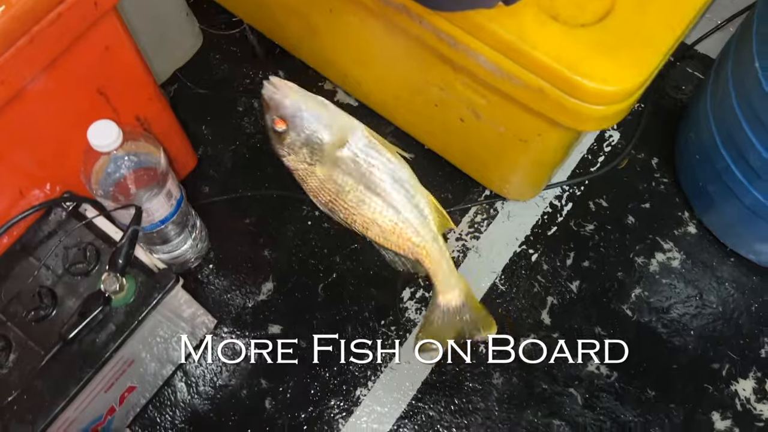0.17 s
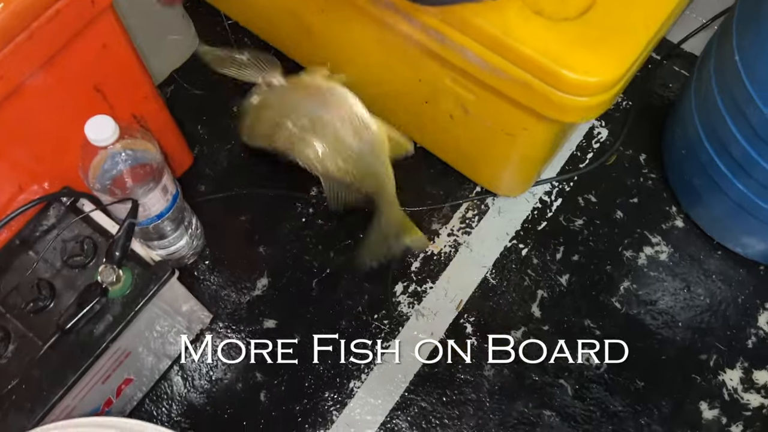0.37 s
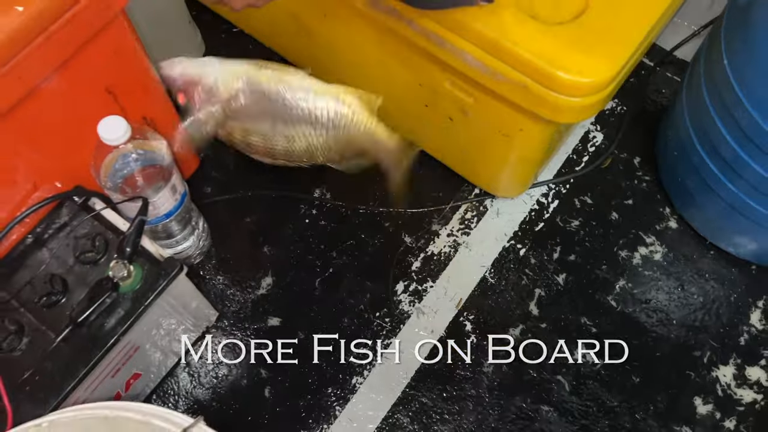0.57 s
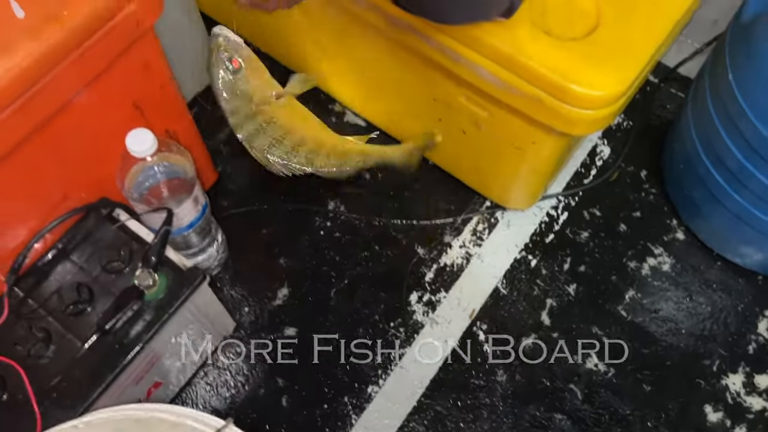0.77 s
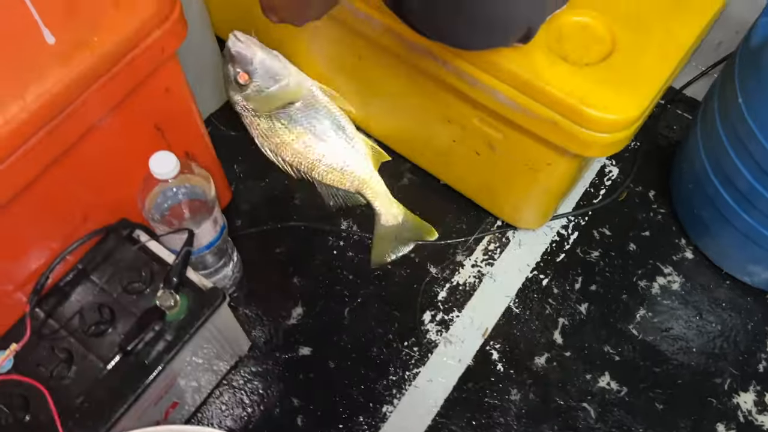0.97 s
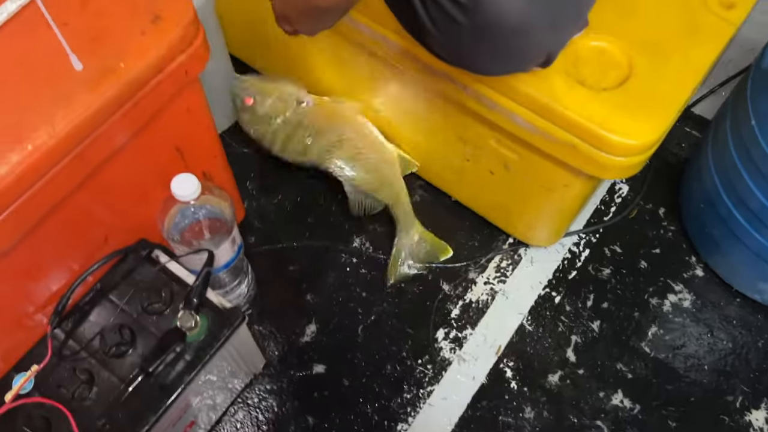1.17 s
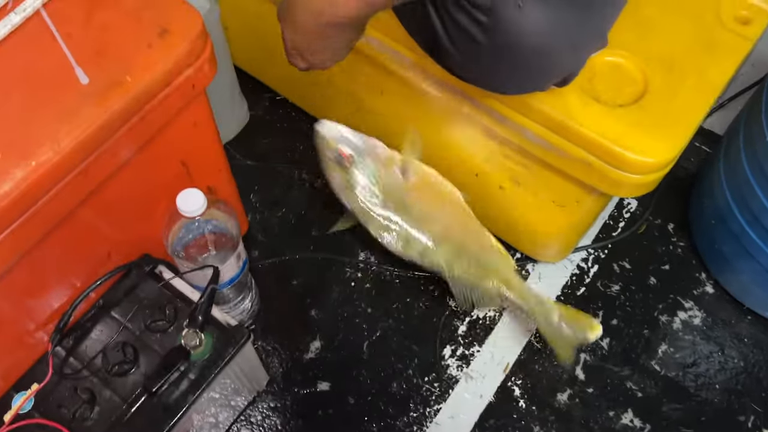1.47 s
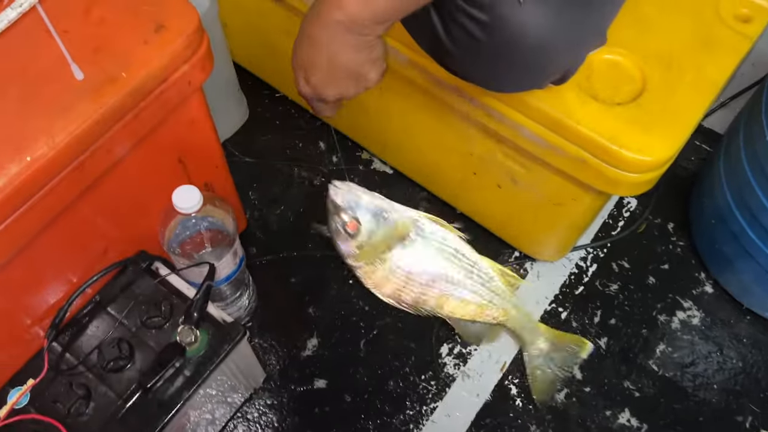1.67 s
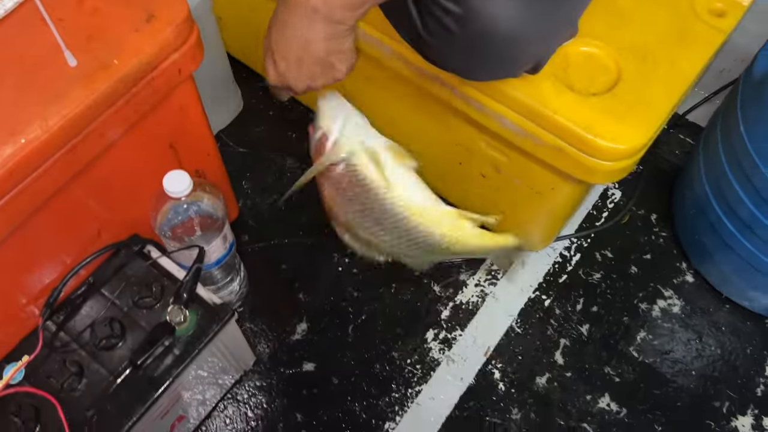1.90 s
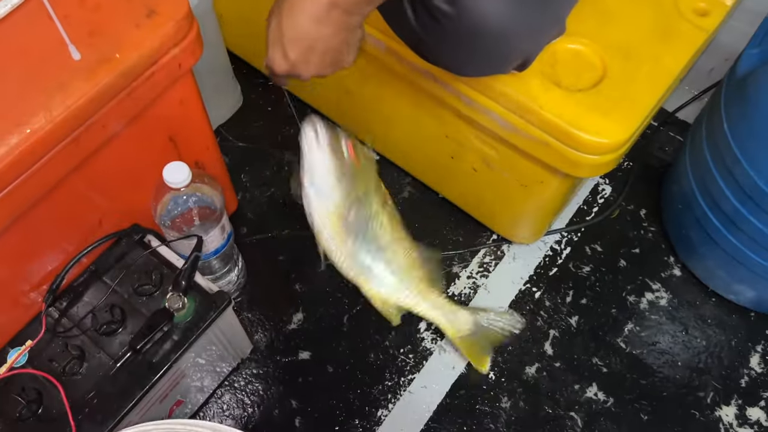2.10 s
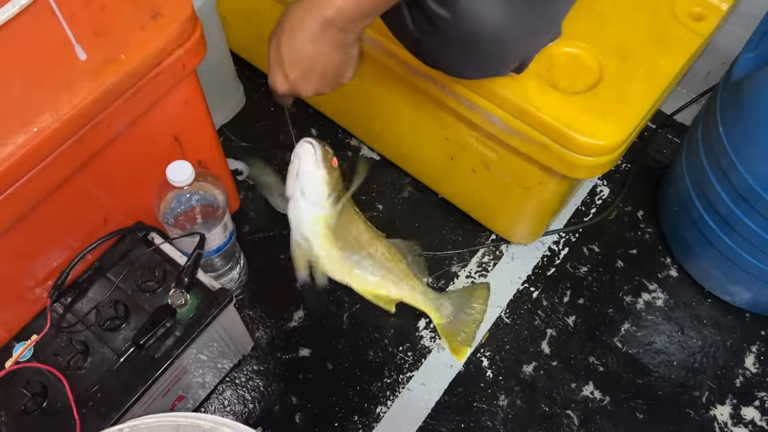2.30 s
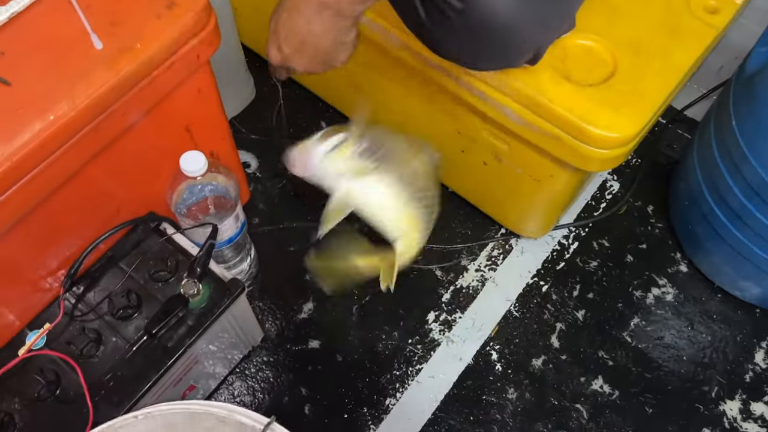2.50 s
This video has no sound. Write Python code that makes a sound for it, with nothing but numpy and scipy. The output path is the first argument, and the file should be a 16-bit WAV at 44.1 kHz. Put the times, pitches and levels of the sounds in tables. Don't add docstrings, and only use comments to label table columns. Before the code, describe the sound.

Fish flopping on deck: irregular hollow thumps, wet smacks, slippery slides and small ticks, close up

```python
import sys
import numpy as np
from scipy import signal
from scipy.fft import rfft, irfft, next_fast_len
from scipy.io import wavfile
from scipy.ndimage import uniform_filter1d

SR = 44100
rng = np.random.default_rng(int(sys.argv[2]) if len(sys.argv) > 2 else 0)


def invert_db(level):
    return 10 ** (np.asarray(level, dtype=float) / 20)


def unload_audio(sound):
    columns = np.transpose(np.atleast_2d(sound))
    steps = np.round(np.clip(columns, -1, 1) * 32767)
    wavfile.write(sys.argv[1], SR, steps.astype(np.int16))


N = 116865


def rms_one(x):
    return x / np.sqrt(np.mean(x ** 2) + 1e-20)


def at_hz(points, hz):
    table_hz, table_db = np.transpose(points)
    return np.interp(np.log(hz + 1), np.log(table_hz), table_db)


def drift(rate_hz):
    r = np.exp(-2 * np.pi * rate_hz / SR)
    white = rng.standard_normal(N + SR)
    return rms_one(signal.lfilter([1], [1, -2 * r, r * r], white)[SR:])


def add(out, start_s, x):
    i = max(int(start_s * SR), 0)
    out[..., i:i + x.shape[-1]] += x[..., :N - i]


def ring(x, hz, t60):
    r = invert_db(-60 / (t60 * SR))
    w = 2 * np.pi * hz / SR
    return signal.lfilter([0, np.sin(w)], [1, -2 * r * np.cos(w), r * r], x + 1e-18)


def highpass(order, hz, x):
    return signal.sosfilt(signal.butter(order, hz, "high", fs=SR, output="sos"), x)


def wet_noise(size, dull_hz, floor_db=0):
    white = rng.standard_normal((2, size))
    lowpass = signal.butter(2, min(dull_hz, .4 * SR), fs=SR, output="sos")
    dull = signal.sosfilt(lowpass, white) * np.sqrt(SR / 2 / dull_hz)
    return highpass(1, dull_hz / 20, dull + invert_db(floor_db - 9.5) * white)


# time in seconds, hull level in dB, hiss level in dB.
ROCKING_CURVE = [(0, 17, 8.5), (.15, 6, 0.5), (.3, 7.5, 11), (.43, 2, -2.5), (.56, -15, -1.5),
                 (.82, 3.5, -0.5), (.95, -1.5, -2.5), (1.2, -4.5, 8), (1.37, 0, -3), (1.47, 4, 5),
                 (1.67, 7.5, -0.5), (1.85, 2, 8.5), (2.0, -3, -2.5), (2.25, 6.5, 0), (2.4, 1, 2.5),
                 (2.58, -6, -0.5), (2.65, -11, -3.5)]


def rocking(column):
    rows = np.array(ROCKING_CURVE)
    return invert_db(np.interp(np.arange(N) / SR, rows[:, 0], rows[:, column]))


# frequency in Hz, level in dB per Hz.
WATER_SPECTRUM = [(150, 2.5), (400, -9), (1000, -13), (3000, -12), (8000, -19.5), (15000, -31)]


def water():
    hz = np.arange(N // 2 + 1) * SR / N
    white = rfft(rng.standard_normal((2, N)))
    hiss = irfft(white * invert_db(at_hz(WATER_SPECTRUM, hz)) * (hz > 40), N)
    return invert_db(-52.5 + 1.2 * drift(19)) * rocking(column=2) * rms_one(hiss)


def hull():
    mode_hz, width_hz = 68, 18
    white = rng.standard_normal((2, N + SR))
    once = ring(white, mode_hz, 1.1 / width_hz)
    hum = ring(once, mode_hz, 1.1 / width_hz)[:, SR:]
    return invert_db(-49.5 + .8 * drift(6)) * rocking(column=1) * rms_one(hum)


# start in seconds, level in dB, pitch in Hz, t60 in seconds.
BOARD_SWAYS = [(0.121, -51.5, 335, 0.25), (.22, -40, 44.3, 0.16), (0.421, -43, 71.4, 0.7),
               (0.881, -36.5, 102.7, 0.36), (1.239, -48, 200, 0.28), (1.279, -51, 289, 0.33),
               (1.409, -46, 120, 0.43), (1.459, -40, 98, 0.34), (1.547, -26.5, 441, 0.12),
               (1.601, -28, 45, .2), (1.59, -46.5, 531, 0.14), (1.662, -38, 140, 0.13),
               (1.81, -30, 42.2, 0.23), (2.189, -30, 322, 0.14), (2.222, -25, 117.6, 0.36),
               (2.238, -38, 189, 0.26), (2.3, -52.5, 624, 0.15), (2.354, -36.5, 96.8, 0.41)]


def sways():
    rise_cycles, pair_ratio = 1.8, 1.09
    out, t = np.zeros(N), np.arange(SR // 2) / SR
    for s, db, hz, t60 in BOARD_SWAYS:
        phase = rng.uniform(0, 2 * np.pi, 2)
        lower = np.sin(2 * np.pi * hz * t + phase[0])
        upper = 0.68 * np.sin(2 * np.pi * pair_ratio * hz * t + phase[1])
        swell = np.minimum(t * hz / rise_cycles, 1) ** 2
        add(out, s, invert_db(db - 60 * t / t60) * (lower + upper) * swell)
    return out


# start in seconds, length in seconds, level in dB, frequency in Hz above which it is dulled.
SKIN_SLIDES = [(.01, 0.091, -42, 5560), (0.19, 0.034, -49, 4520), (0.258, 0.11, -46, 8000),
               (0.336, 0.054, -50.5, 3000), (0.457, 0.12, -49.5, 7000), (0.574, 0.065, -43.5, 7460),
               (0.699, 0.066, -41, 2540), (0.922, 0.086, -58, 5960), (1.03, 0.056, -56, 2470),
               (1.142, 0.059, -45.5, 7560), (1.223, 0.11, -49.5, 2900), (1.29, 0.053, -47.5, 8200),
               (1.425, 0.06, -36, 6000), (1.708, 0.075, -48, 8650), (1.766, 0.08, -38.5, 8600),
               (1.83, 0.1, -59.5, 5000), (1.92, 0.3, -55.5, 4260), (2.255, 0.041, -52, 5960),
               (2.33, 0.049, -45, 8450), (2.424, 0.09, -46, 8250), (2.459, 0.053, -39, 12400),
               (2.507, 0.047, -47, 5540), (0.838, 0.024, -48.5, 8000), (0.082, 0.018, -46, 3020)]


def slides():
    pops_per_s, pop_db, rise_share = 250, -2.5, 0.39
    out, stroking = np.zeros((2, N)), np.zeros(N)
    rough = invert_db(3 * drift(72))
    for s, length, db, dull_hz in SKIN_SLIDES:
        noise = wet_noise(SR // 4, dull_hz)
        progress = np.arange(SR // 4) / SR / length
        swell = np.interp(progress, [0, rise_share, 1.3], [0, 1, 0])
        stroke = invert_db(db) * np.sin(np.pi / 2 * swell)
        add(out, s, noise * stroke)
        add(stroking, s, stroke)
    size_db = np.minimum(rng.exponential(1, N), 3)
    born = (rng.random(N) < pops_per_s / SR) * invert_db(size_db) * rng.choice([-1, 1], N)
    dealt = rng.integers(0, 12, N)
    pops = np.zeros(N)
    for k, hz in enumerate(np.geomspace(500, 3000, num=12)):
        pops += ring(born * stroking * (dealt == k), hz, 3.8 / hz)
    return out * rough + invert_db(pop_db) * pops


# start in seconds, length in seconds, level in dB, pitch in Hz, bandwidth in Hz.
RUBBING_SQUEAKS = [(.176, .025, -41, 3500, 500), (.352, .035, -45, 1600, 500), (.995, .03, -44, 2200, 700),
                   (1.122, .08, -44, 1900, 900), (1.155, .03, -50, 7300, 500),
                   (1.222, .035, -53, 4400, 1000), (2.26, .04, -57, 5100, 900), (2.32, .06, -58, 8630, 200),
                   (2.336, .085, -46, 3065, 20), (2.568, .06, -56, 1410, 70), (2.6, .06, -57, 1470, 70),
                   (2.595, .055, -57, 3120, 45), (2.605, .03, -59, 8630, 200)]


def squeaks():
    out, t = np.zeros(N), np.arange(SR // 4) / SR
    for s, length, db, hz, width_hz in RUBBING_SQUEAKS:
        friction = rng.standard_normal(len(t) + 4000)
        once = ring(friction, hz, 1.4 / width_hz)
        tone = ring(once, hz, 1.4 / width_hz)[4000:]
        tone = tone / np.sqrt(uniform_filter1d(tone ** 2, size=500) + 1e-20)
        swell = np.interp(t / length, [0, .15, .5, 1.2], [0.79, 1.0, 1.0, 0])
        add(out, s, invert_db(db) * rms_one(tone) * swell)
    return out


# start in seconds, peak level in dB, pitch in
# Hz, t60 in seconds.
SMALL_TICKS = [(0.652, -23.5, 912, 0.086), (0.869, -27, 2390, 0.037), (1.524, -18, 1160, 0.1),
               (1.525, -10, 2370, 0.016), (2.144, -14.5, 1524, 0.045), (2.32, -48, 1460, 0.07),
               (2.491, -56, 905, 0.03), (2.564, -38, 1383, 0.041), (2.568, -44.5, 799, 0.12),
               (2.641, -33.5, 1480, 0.046), (2.641, -35, 5300, 0.0032),
               (.286, -40, 900, 0.026), (0.294, -35, 1290, 0.021), (.303, -29, 770, 0.027),
              (0.314, -30.5, 1220, 0.029), (0.322, -27.5, 1014, 0.01), (0.346, -50, 1630, 0.035),
              (.356, -36.5, 1700, 0.039), (0.383, -38, 1180, 0.013), (0.622, -33.5, 1170, 0.061),
              (.626, -46, 1560, 0.019), (1.122, -38, 1940, 0.051), (1.125, -34.5, 2780, 0.023),
              (1.15, -32, 2240, 0.052), (1.168, -40, 1920, .04), (1.203, -38.5, 1544, 0.048),
              (1.732, -43.5, 1230, 0.036), (1.732, -44, 770, 0.027), (1.783, -52, 1257, 0.081),
              (2.469, -39.5, 2110, 0.077), (2.498, -34.5, 1340, 0.028), (2.519, -40, 525, 0.058)]


def ticks():
    out, t = np.zeros(N), np.arange(SR // 4) / SR
    for s, db, hz, t60 in SMALL_TICKS:
        scrape = rng.standard_normal(len(t)) * invert_db(-16 - 60 * t / .005)
        add(out, s, invert_db(db) * ring(scrape + (t == 0), hz, t60))
    return out


# start in seconds, level in dB, frequency in Hz above which it is dulled, splash t60 in seconds.
SKIN_SLAPS = [(0.177, -36.5, 4640, 0.095), (.288, -33, 1370, 0.42), (.597, -46, 3970, 0.057),
              (0.623, -35.5, 1170, 0.098), (0.645, -24, 3070, 0.13), (.653, -21.5, 5700, 0.23),
              (.875, -22.5, 7000, 0.19), (.998, -38.5, 3450, 0.013), (1.123, -45.5, 2700, 0.075),
              (1.525, -12, 4670, 0.16), (1.732, -43.5, 1190, 0.024), (2.031, -48.5, 8500, 0.43),
              (2.142, -17, 6850, 0.15), (2.319, -48, 6040, 0.61), (2.609, -55, 9200, 0.14)]


def slaps():
    lead_s, squeeze_s, crack_rise_s, crack_t60_s = .02, 0.0069, .0012, 0.018
    squeeze_db, splash_db = -0.5, -3
    out, t = np.zeros((2, N)), np.arange(SR // 4) / SR - lead_s
    for s, db, dull_hz, t60 in SKIN_SLAPS:
        noise = wet_noise(len(t), dull_hz, 6 * np.log2(dull_hz / 6000))
        rise = np.clip(t / crack_rise_s, 0, 1)
        bright = (dull_hz / 5000) ** 1.5 * rng.standard_normal(len(t))
        crack = rise * (noise[0] + bright) * invert_db(-60 * t / crack_t60_s)
        squeeze = invert_db(squeeze_db + 20 * np.minimum(t, 0) / squeeze_s) * (1 - rise) * (t > t[0])
        splash = rise * invert_db(splash_db - 60 * t / t60)
        spray = noise[::-1] * invert_db(2.0 * drift(100)[:len(t)]) * (squeeze + splash)
        add(out, s - lead_s, invert_db(db) * (crack + spray))
    return out


# start in seconds, peak level in dB, panel pitch in Hz, t60 in seconds.
BODY_THUMPS = [(.001, -24.5, 100.4, 0.18), (0.061, -33, 88.3, 0.6), (.185, -31.5, 199, 0.16),
               (.218, -26.5, 88, 0.12), (0.289, -29.5, 330, 0.16), (0.302, -13, 162.4, 0.081),
               (0.341, -24, 167.8, 0.14), (.623, -23, 241.5, 0.15), (0.647, -30.5, 436, 0.17),
               (.655, -10.5, 203.2, 0.11), (0.655, -17.5, 81.4, 0.25), (0.717, -26, 157, 0.15),
               (.800, -33.5, 75, 0.3), (0.8771, -14.5, 202, 0.12), (.876, -26.5, 305, 0.11),
               (1.000, -40.5, 226, 0.12), (1.065, -37.5, 188.4, 0.15), (1.182, -39, 248, 0.21),
               (1.324, -34, 114, 0.081), (1.526, -13.5, 597, 0.072), (1.525, -10, 176.6, 0.19),
               (1.53, -10, 113.1, 0.21), (1.813, -26.5, 81.8, 0.34), (2.143, -9.5, 313, 0.096),
               (2.145, -5, 201.5, 0.073), (2.15, -5.5, 110.7, 0.19), (2.158, -22, 46.6, 0.084),
               (2.492, -28.5, 660, 0.047)]
# ratio to the pitch, level in dB.
PANEL_MODES = [(1, -7.5), (1.23, -8.5), (1.62, -6), (2.1, -9.5), (3.7, 1)]


def thumps():
    push_cycles, shake_db, shake_share, damping = 0.39, 12.5, 1.4, 1.3
    out, t = np.zeros(N), np.arange(SR // 2) / SR
    for s, db, hz, t60 in BODY_THUMPS:
        push = np.sin(np.pi * np.minimum(t * hz / push_cycles, 1)) ** 2
        push = highpass(2, 0.86 * hz, push / push.sum())
        push = push + invert_db(-3) * np.interp(t - 1 / hz, t, push, left=0)
        fade = invert_db(shake_db - 60 * t / (shake_share * t60))
        shake = rng.standard_normal(len(t)) * fade * np.sqrt(hz / SR) / 10
        for ratio, mode_db in PANEL_MODES:
            force = push + rng.choice([-1, 1]) * shake / ratio ** 2
            add(out, s, invert_db(db + mode_db) * ring(force, hz * ratio, t60 / ratio ** damping))
    return out


BOX_DELAYS = [.0031, .0047, .0083, .0122]


def echoes(x):
    out = np.zeros((2, N))
    for k, lag in enumerate(BOX_DELAYS):
        add(out[k % 2], lag, invert_db(-16.5 - 0.67 * k) * x)
    return out


def scene():
    background = water() + hull()
    knocks = sways() + squeaks() + ticks() + thumps()
    smacks = slaps()
    reflected = echoes(knocks + smacks.mean(axis=0))
    return background + slides() + knocks + smacks + reflected


def low_pass(x):
    return signal.sosfilt(signal.butter(12, 16200, fs=SR, output="sos"), x)


# frequency in Hz, level of the difference signal in dB.
PORT_WIDTH = [(60, -12.5), (200, -12.5), (500, -3.5), (1200, -2.5), (3000, -2), (7600, -4)]
# frequency in Hz, lead of the left
LEFT_LEAD = [(0, 0), (3400, 2.2), (4300, 0), (7000, -.6), (8800, -1.6), (9950, -np.pi), (10500, -np.pi),
             (12800, -2 * np.pi), (14300, -2 * np.pi), (16000, -9.0)]
# frequency in Hz, left over right in dB.
PORT_LEAN = [(60, 0), (400, -.5), (900, 1.5), (2700, -2), (5500, 3), (8500, 0), (20000, 0)]
# frequency in Hz, gain in dB.
PORT_COLOUR = [(300, 10.24), (2000, 0.17), (6000, 0.47), (10000, 7.1), (13000, 14.25), (15800, 8)]


def record(dry):
    alike_above_hz, cutoff_hz, low_hz = 8800, 15850, 41
    size = next_fast_len(N + 4096)
    hz = np.arange(size // 2 + 1) * SR / size
    left, right = rfft(dry, size)
    mid = (left + right) / 2
    side = (left - right) / 2 * invert_db(at_hz(PORT_WIDTH, hz)) * (hz < alike_above_hz)
    lead = np.interp(hz, *np.transpose(LEFT_LEAD))
    turn = invert_db(at_hz(PORT_LEAN, hz) / 2) * np.exp(.5j * lead)
    gain = invert_db(at_hz(PORT_COLOUR, hz) - np.maximum(hz - cutoff_hz, 0) / 12.0)
    ports = irfft(gain * np.array([(mid + side) * turn, (mid - side) / turn]), size)[:, :N]
    rounded = 0.81 * np.tanh(ports / 1.17)
    return low_pass(highpass(3, low_hz, rounded))


dry = scene()
out = record(dry)
unload_audio(out)
```